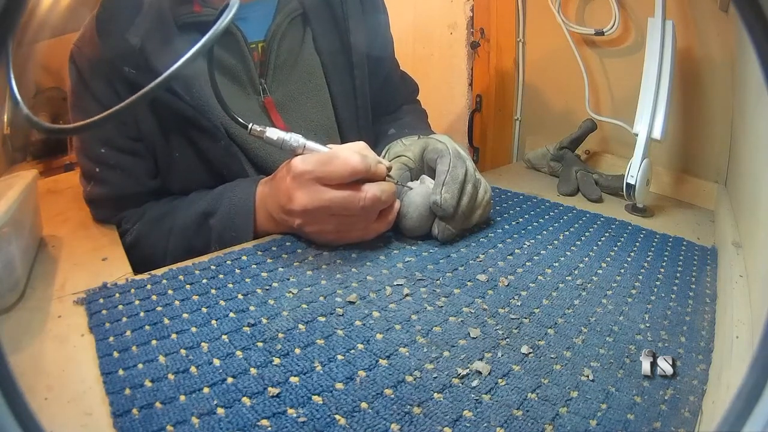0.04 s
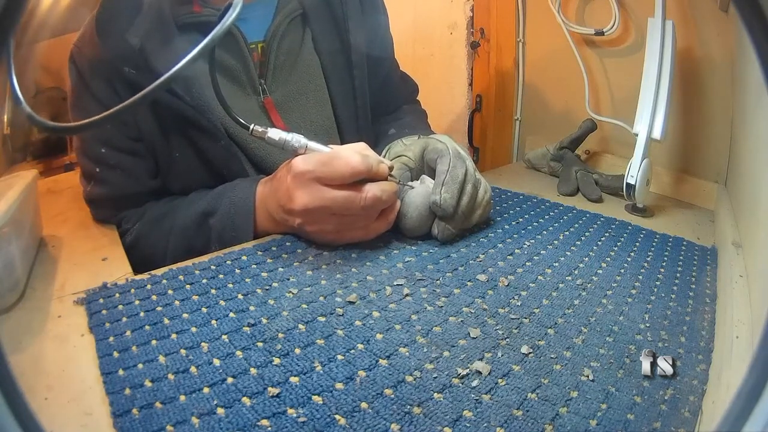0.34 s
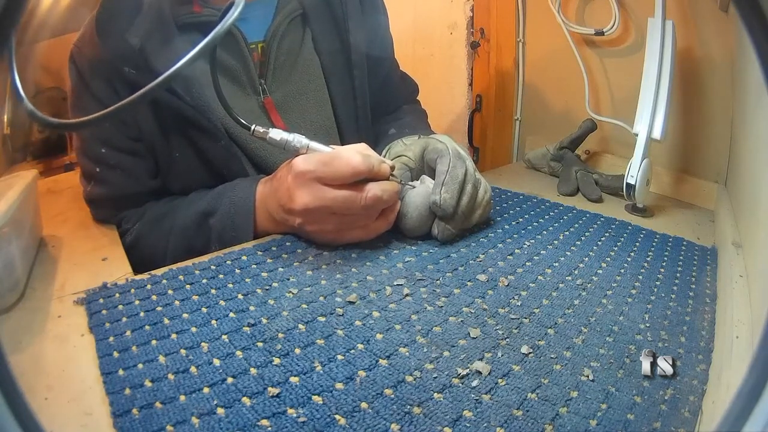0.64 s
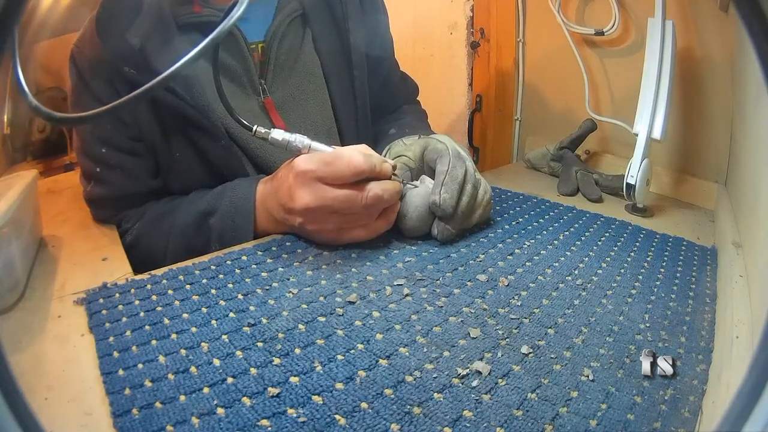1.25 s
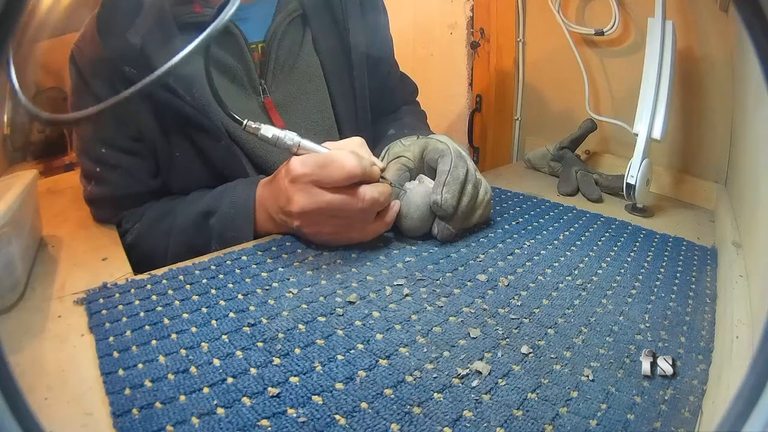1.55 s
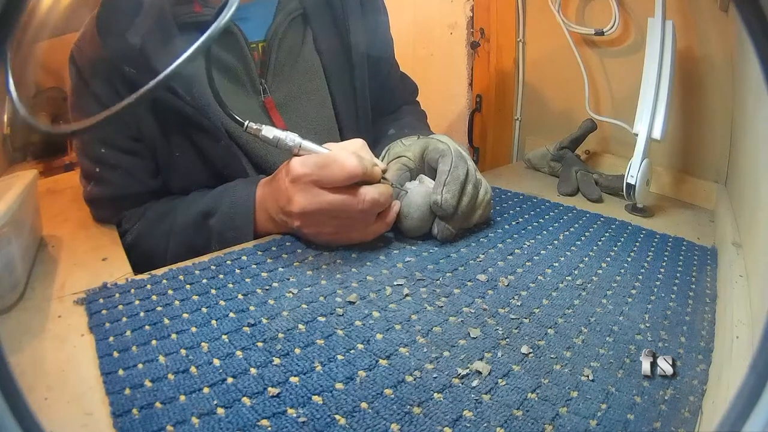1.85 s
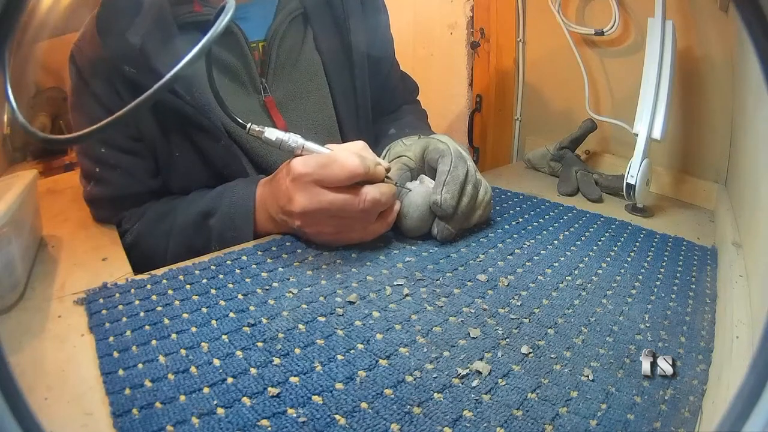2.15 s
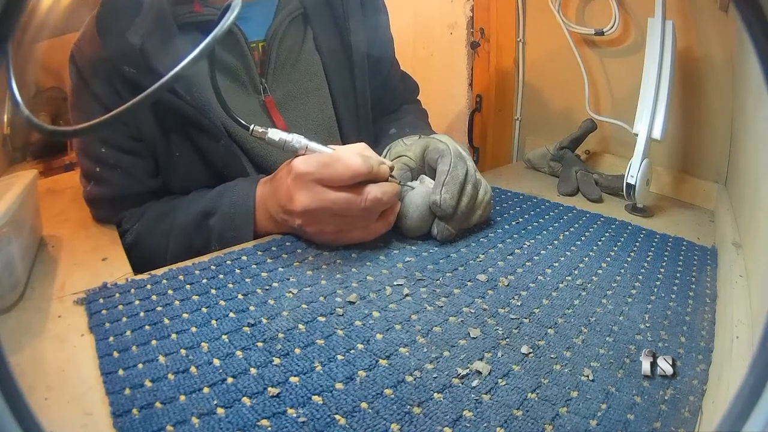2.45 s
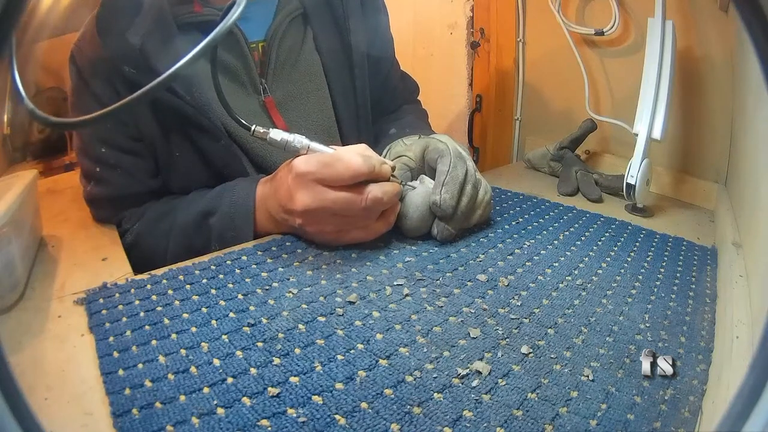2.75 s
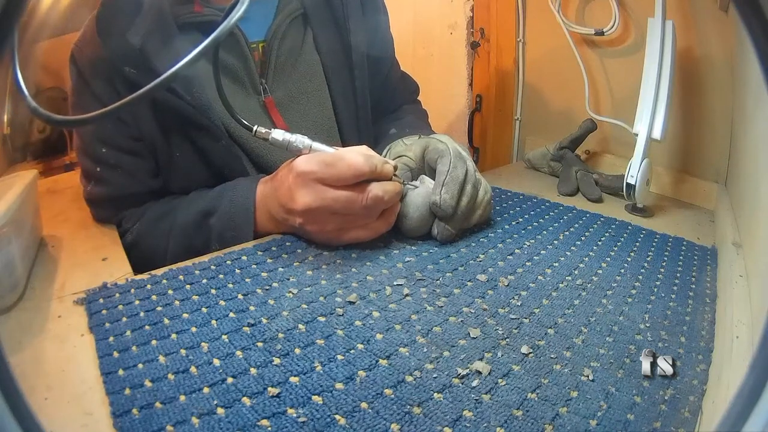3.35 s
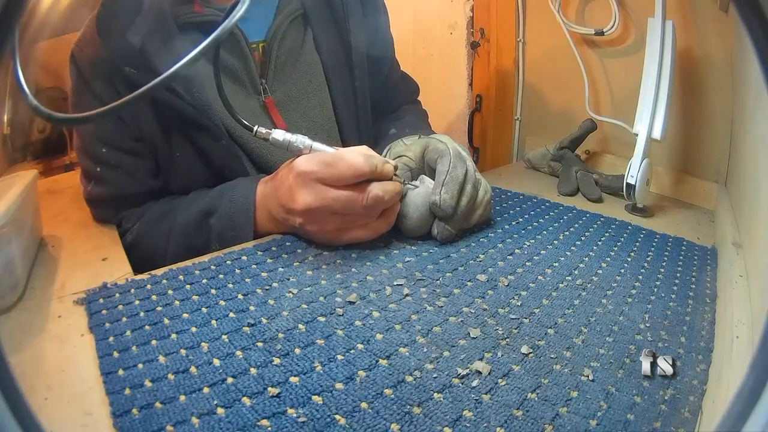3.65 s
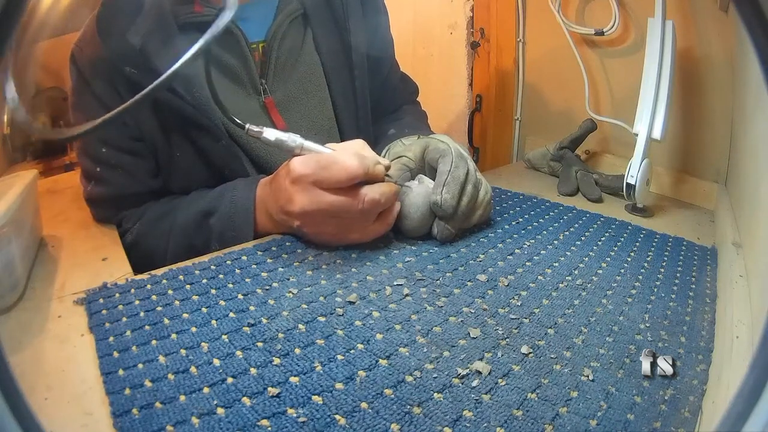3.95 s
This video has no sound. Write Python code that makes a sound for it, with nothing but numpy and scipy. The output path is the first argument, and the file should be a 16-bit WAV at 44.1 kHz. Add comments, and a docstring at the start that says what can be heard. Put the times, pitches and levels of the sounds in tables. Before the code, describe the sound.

A pneumatic engraving pen buzzes and hisses continuously at a workbench, tiny flakes ticking off a stone. Midway the low drumming drops away and the tip whistles and screeches thinly, before the buzz bears down harder.

```python
"""An air-driven engraving pen chips at a small stone held in a gloved hand on a padded bench.
Its piston strikes about 215 times a second, puffing out air and drumming through the hand into the bench.
Flakes break off early on. At 1.3 s the pen eases off: it runs faster, sounds more nasal and whistles.
From 1.7 s the tip chatters as it bites again, and two more flakes break off. From 2.5 s the pen is
pressed down, a little slower and drumming hard, until it eases off just before the end at 4 s."""
import sys
import numpy as np
from scipy import signal
from scipy.fft import rfft, irfft, next_fast_len
from scipy.io import wavfile
from scipy.ndimage import map_coordinates

SR = 44100
rng = np.random.default_rng(int(sys.argv[2]) if len(sys.argv) > 2 else 0)


def log_audio(samples):
    """Write samples as a 16-bit WAV file to the path given in sys.argv[1]."""
    # one column per channel
    frames = np.atleast_2d(samples).T
    # limit to full scale, then quantise
    limited = np.clip(frames, -1, 1)
    pcm = np.round(limited * 32767).astype(np.int16)
    wavfile.write(sys.argv[1], SR, pcm)


N = 176400


def amp(db):
    """Turn decibels into a number to multiply by."""
    return 10 ** (np.asarray(db) / 20)


def unit(x):
    """Scale a sound to an average strength (rms) of 1."""
    return x / np.sqrt(np.mean(x ** 2) + 1e-20)


def curve(rows):
    """Join (time, value) points with straight lines."""
    return np.interp(np.arange(N) / SR, *np.transpose(rows))


def swell(s, half_length):
    """A smooth bump of height 1 at time s."""
    return np.exp(-((np.arange(N) / SR - s) / half_length) ** 2)


def wobble(rate):
    """A smooth curve through `rate` random points a second."""
    points = rng.standard_normal(int(N * rate / SR) + 4)
    return map_coordinates(points, [np.arange(N) * rate / SR], mode="nearest")


def flutter(count=90):
    """A random zigzag."""
    return curve(np.c_[np.linspace(0, N / SR, count), rng.standard_normal(count)])


def filtered(x, response):
    """Turn each frequency up or down by response(hz)."""
    size = next_fast_len(N + SR // 4)
    return irfft(rfft(x, size) * response(np.fft.rfftfreq(size, 1 / SR)), size)[:N]


def noise(colour, gate=1):
    """Noise of strength 1: gate makes it pulse, colour sets its lows and highs."""
    f, db = np.transpose(colour)
    white = gate * rng.standard_normal(N)
    return unit(filtered(white, lambda hz: amp(np.interp(np.log(hz + 1), np.log(f), db))))


def ring(x, notes):
    """Let x shake something that rings at these notes; the result has strength 1."""
    return unit(filtered(x, lambda hz: sum(
        amp(db) * 1j * hz * width / (f * f - hz * hz + 1j * hz * width) for f, width, db in notes)))


# Strokes a second: t/s, f/Hz
STROKE_RATE = [(0, 216.2), (.17, 215.4), (.7, 215.1), (1.13, 215.7), (1.25, 215.1), (1.33, 218.4),
               (1.6, 218.3), (1.78, 217.4), (1.92, 217.3), (2.04, 216.3), (2.42, 216.2), (2.58, 214.8),
               (2.78, 215.4), (3.35, 215.4), (3.45, 214.9), (3.79, 215.2), (3.93, 218.5)]
def stroke_angle(jitter_s=5e-6):
    """How far the piston has got: 2 pi for every stroke."""
    rate = curve(STROKE_RATE)
    return 2 * np.pi * (np.cumsum(rate) / SR + jitter_s * rate * wobble(200))


# The pen's lift: t/s, ease (0 pressed on the stone, 1 free)
EASING = [(0, 0.13), (.45, 0), (1.26, 0.05), (1.31, 0.98), (1.62, 0.91), (1.85, 0.75), (2.05, 0.34),
          (2.4, 0.22), (2.55, 0), (3.81, 0.03), (3.87, 0.57), (3.92, 0.93)]
def eased_off():
    """How far the hand eases the pen off the stone."""
    return curve(EASING)


# Changes in the rasp: t/s, half length/s, gain/dB
RASP_CHANGES = [(.085, .042, -10), (.39, .018, -3), (1.15, .025, -3), (1.994, .13, 4.5), (2.44, .03, -2.5)]
def bite_db():
    """The rasp thins as the tip glances off and swells as it digs in."""
    return sum(db * swell(s, half) for s, half, db in RASP_CHANGES)


def overtone_db(table, k):
    """Level of overtone k; past the table's end they fade by 1 dB each."""
    return table[k - 2] if k - 2 < len(table) else -20 - (k - 1 - len(table))


# Overtones at 2, 3, 4... times the stroke rate, pressed and free: relative level/dB
PRESSED_TONES = [-18, -20, -18, -19, -21, -16, -20.5, -22, -26, -12, -13, -16, -19, -14, -10, -17, -22.5,
                 -12, -24, -28, -11, -16.5, -17, -16, -21, -7, -18, -16, -17, -10.5, -13, -11, -15, -10.5,
                 -15.5, -16, -13, -22, -17, -25, -23, -15, -13]
FREE_TONES = [-28, -11.5, -18, -8, -18, -18.5, -2.5, -3.5, -4.5, -12, -19, -24, -19, -17, -14, -14.5, -17,
              -23, -28, -24, -11, -19, -9, -20, -11, -19, -19, -18, -11, -9.5, -15, -13, -18, -17, -25, -12,
              -10]
def piston(angle, pressed_db=-23.5, free_db=-26.5, rasp_hz=3800, rasp_width_hz=1570):
    """Each stroke is a loose burst of overtones; their mix shifts as the pen eases off."""
    ease, bite = eased_off(), bite_db()
    stroke_hz = np.mean(curve(STROKE_RATE))
    grain = rng.standard_normal(256)  # one stroke's worth of noise
    swing = np.cos(2 * np.pi * np.arange(256) / 256)
    buzz = np.zeros(N)
    for k in range(2, 46):
        hz = k * stroke_hz
        khz = hz / 1000
        db = (1 - ease) * (pressed_db + overtone_db(PRESSED_TONES, k))
        db += ease * (free_db + overtone_db(FREE_TONES, k))
        db += (1.04 + 0.21 * khz) * flutter()  # high overtones waver more
        db += bite * np.exp(-((hz - rasp_hz) / rasp_width_hz) ** 2)
        db -= 0.36 * khz  # soften the treble
        burst = rfft(grain * amp((2.5 + 1.4 * khz) * swing))  # high overtones bunch more tightly
        buzz += amp(db) * np.cos(k * angle + np.angle(burst[k]))
    return np.sqrt(2) * buzz


def air_flow(angle, once_db=4, twice_db=-4.1, scatter_db=0.93):
    """The air swells once and twice a stroke, never quite evenly."""
    puff_db = once_db * np.cos(angle) + twice_db * np.cos(2 * angle)
    return amp(puff_db + scatter_db * wobble(200))


# Loudness of the hiss: t/s, relative level/dB
HISS_LEVEL = [(0, -22.5), (1.1, -22), (1.4, -24.5), (1.9, -22), (2.3, -23), (2.9, -22.5), (3.75, -24),
              (4, -25.5)]
# Its colour: f/Hz, relative level/dB
HISS_COLOUR = [(300, -24.5), (560, -30), (760, -14.5), (1000, -22), (1300, -25), (1700, -13), (2500, -16),
               (3000, -17), (4400, -13.5), (4850, -3), (5950, 3), (6350, -7.5), (6800, -1), (7500, 0),
               (8150, -1.5), (8600, -4.5), (9000, -7), (9550, -0.5), (9930, -14), (10080, -24),
               (10300, -11.5), (10700, -10), (12400, -13), (12950, -21), (13400, -14), (15000, -28.5),
               (16000, -40)]
def exhaust(flow, steady_above_hz=12700, gain_db=-1):
    """Used air hisses out in puffs; its highest fizz is steady."""
    puffed_share = lambda hz: 1 / (1 + (hz / steady_above_hz) ** 8)
    puffs = filtered(noise(HISS_COLOUR, flow), lambda hz: np.sqrt(puffed_share(hz)))
    fizz = filtered(noise(HISS_COLOUR), lambda hz: np.sqrt(1 - puffed_share(hz)))
    return amp(curve(HISS_LEVEL) + gain_db) * (puffs + fizz)


# Drumming in the bench: t/s, level/dB
DRUM_LEVEL = [(0, -28), (.6, -27), (1.11, -23), (1.135, -27), (1.24, -27.5), (1.27, -23), (1.31, -43),
              (1.5, -52), (1.655, -53), (1.69, -31), (2.2, -29.5), (2.39, -25), (2.52, -30), (2.75, -24),
              (3.2, -22.5), (3.78, -24), (3.88, -30), (3.93, -51)]
# Skids of the tip: t/s, half length/s, knock level/dB, dip in the hum/dB
TIP_SKIDS = [(.415, .015, -44, 3), (.5, .012, -40, 10), (1.146, .018, -36, 3.5), (1.215, .035, -34.5, 3.5),
             (1.78, .04, -37, 1.5), (2.21, .014, -36, 7), (2.44, .022, -36, 6), (2.495, .01, -42, 10),
             (2.64, .02, -44, 4), (3.47, .03, -52, 2.5)]
# Colour of the knocking: f/Hz, relative level/dB
KNOCK_COLOUR = [(30, -35), (100, -20), (150, -6), (200, 6), (240, 7.5), (280, -17), (380, -19), (460, -11),
                (540, -39), (1000, -64)]
def bench(angle, waver_db=.7, uneven_db=-21, loose_db=-18):
    """Blows pass through hand and mat as a hum, which breaks into knocks when the tip skids."""
    drum = amp(curve(DRUM_LEVEL))
    dip_db = sum(dip * swell(s, half) for s, half, _, dip in TIP_SKIDS)
    knock = sum(amp(db) * swell(s, half) for s, half, db, _ in TIP_SKIDS)
    swing = unit(np.cos(angle + 0.2))  # just ahead of the puff
    hum = drum * amp(waver_db * wobble(25.1) - dip_db) * swing
    uneven = amp(uneven_db) + amp(loose_db) * eased_off()  # a lightly held tip knocks more unevenly
    return hum + (uneven * drum + knock) * noise(KNOCK_COLOUR)


# Loudness of the scraping: t/s, level/dB
SCRAPE_LEVEL = [(1.2, -48), (1.35, -53), (1.65, -47), (1.85, -42), (2.01, -34), (2.1, -39), (2.5, -48)]
# Its colour: f/Hz, relative level/dB
SCRAPE_COLOUR = [(400, -64), (800, -12), (1200, -14), (1750, 7), (3600, 13), (4500, -9), (15000, -59)]
def scrape(flow):
    """The tip scrapes the stone at each stroke, more softly when it glances off."""
    glance_db = np.minimum(bite_db(), 0)
    return amp(curve(SCRAPE_LEVEL) + glance_db) * noise(SCRAPE_COLOUR, flow ** 2)


# Colour of the room: f/Hz, relative level/dB
ROOM_COLOUR = [(20, 2), (55, 3), (78, 8), (100, 1), (1000, -35), (10000, -32)]
def room(level_db=-64.5):
    """The room rumbles faintly all the way through."""
    return amp(level_db) * noise(ROOM_COLOUR)


# Hand movements: t/s, half length/s, level/dB
HAND_MOVES = [(.15, .25, -52), (1.79, .08, -45), (2.12, .25, -48)]
# Colour of their rumble: f/Hz, relative level/dB
MAT_COLOUR = [(45, -25), (75, -6), (105, -10), (150, 1), (190, -2), (270, -40)]
def hands():
    """The hands rock the stone against the mat."""
    return sum(amp(db) * swell(s, half) for s, half, db in HAND_MOVES) * noise(MAT_COLOUR)


# Flakes breaking off: t/s, relative level/dB
FLAKES = [(.091, -27), (.325, -16.5), (.471, -26), (2.183, -23), (2.418, -24)]
# Notes of the stone: f/Hz, relative level/dB
STONE_NOTES = [(1745, 0), (2080, -12)]
def chips(rise_s=.0012, fade_s=.0045, crumbs_per_s=50, crumb_db=-36, scatter_db=3):
    """Flakes and crumbs break off while the tip presses; each one ticks in the stone."""
    t = np.arange(SR // 20) / SR
    shape = (1 - np.exp(-t / rise_s)) * np.exp(-t / fade_s)
    tick = shape * sum(amp(db) * np.sin(2 * np.pi * hz * t) for hz, db in STONE_NOTES)
    crumbs = rng.random(N) < crumbs_per_s / SR * (1 - eased_off())
    breaks = crumbs * amp(crumb_db + scatter_db * rng.standard_normal(N))
    for s, db in FLAKES:
        breaks[round(s * SR)] += amp(db)
    return signal.fftconvolve(breaks, tick)[:N]


def tip_shaking(angle, flow, slip_rad=.025, scatter_db=2.5, noise_db=-7):
    """The blows shake the steel tip, partly in step and partly at random."""
    strokes = np.floor((angle + slip_rad * wobble(30)) / (2 * np.pi))
    clicks = np.diff(strokes, prepend=strokes[0])
    blows = unit(clicks * amp(scatter_db * wobble(120)))
    return blows + amp(noise_db) * rng.standard_normal(N) * unit(flow)


# Loudness of the whistle: t/s, level/dB
WHISTLE_LEVEL = [(1.33, -42), (1.38, -30), (1.66, -29.5), (1.72, -40), (1.86, -36), (1.9, -26.5),
                 (2.14, -27), (2.22, -35), (2.55, -42), (3.87, -40), (3.93, -30)]
# The tip's high note: f/Hz, width/Hz, relative level/dB
WHISTLE_NOTE = [(5885, 60, 0)]
def whistle(shaking):
    """The shaken tip whistles at its highest note."""
    return amp(curve(WHISTLE_LEVEL)) * ring(shaking, WHISTLE_NOTE)


# Screeches: t/s, half length/s, first note's level/dB, second note's level/dB
SCREECHES = [(1.705, .04, -31, -42), (1.76, .025, -28, -28), (1.82, .04, -26.5, -35),
             (1.9, .045, -31, -28.5), (1.985, .05, -28, -31), (2.1, .07, -33, -28.5),
             (2.26, .06, -33, -28.5), (2.41, .025, -32, -28.5)]
# The tip's two lower notes: f/Hz, width/Hz, level/dB (evened out by ring)
CHATTER_NOTES = [(5220, 60, 2), (5420, 60, 1)]
def chatter(shaking):
    """The tip chatters on the stone, ringing in short screeches."""
    sound = np.zeros(N)
    for i, note in enumerate(CHATTER_NOTES):
        loudness = sum(amp(levels[i]) * swell(s, half) for s, half, *levels in SCREECHES)
        sound += loudness * ring(shaking, [note])
    return sound


def scene():
    """One stroke cycle drives the whole pen; room, hands and chips join it in one channel."""
    angle = stroke_angle()
    flow = air_flow(angle)
    pen = piston(angle) + exhaust(flow) + bench(angle)
    shaking = tip_shaking(angle, flow)
    tip = scrape(flow) + whistle(shaking) + chatter(shaking)
    return (pen + tip + room() + hands() + chips())[None]


def record(dry, top_hz=15600):
    """Cut away the very highest treble."""
    return np.array([filtered(x, lambda hz: hz < top_hz) for x in dry])


dry = scene()
out = record(dry)
log_audio(out)
```